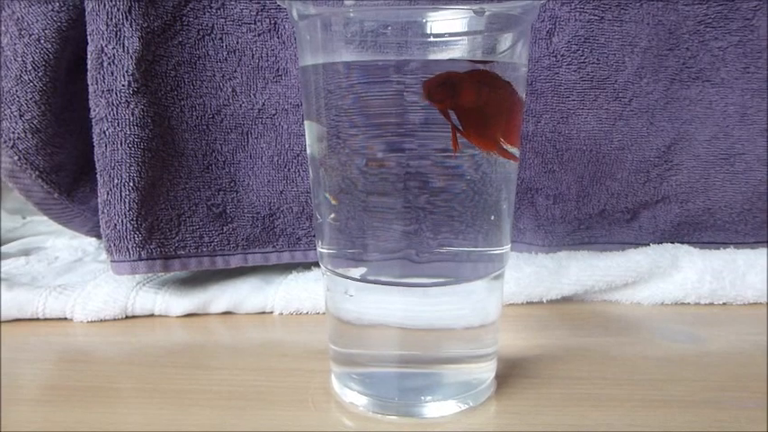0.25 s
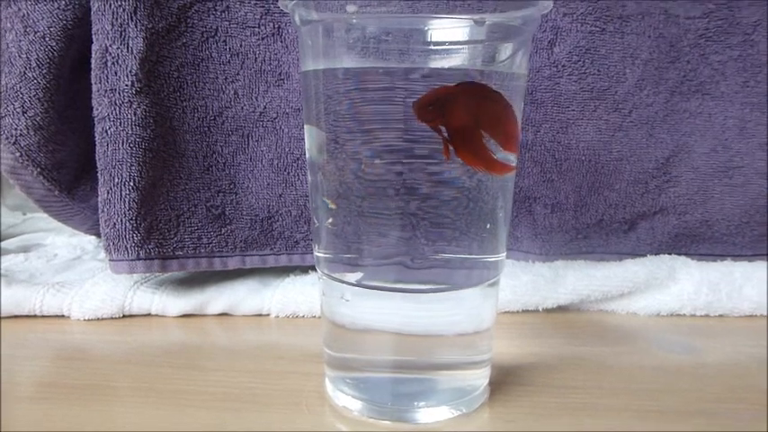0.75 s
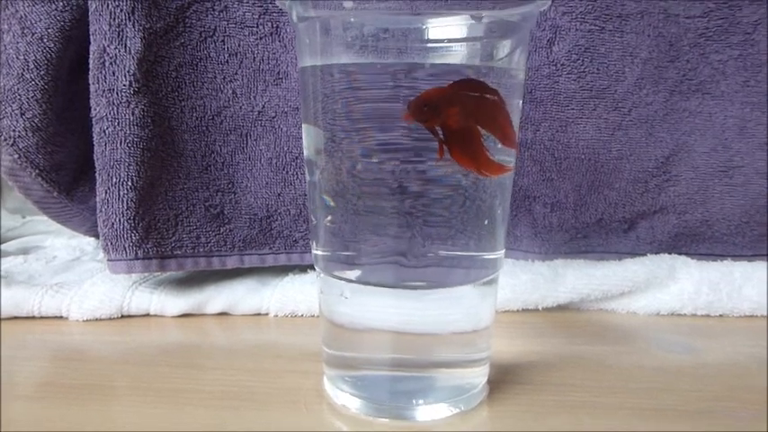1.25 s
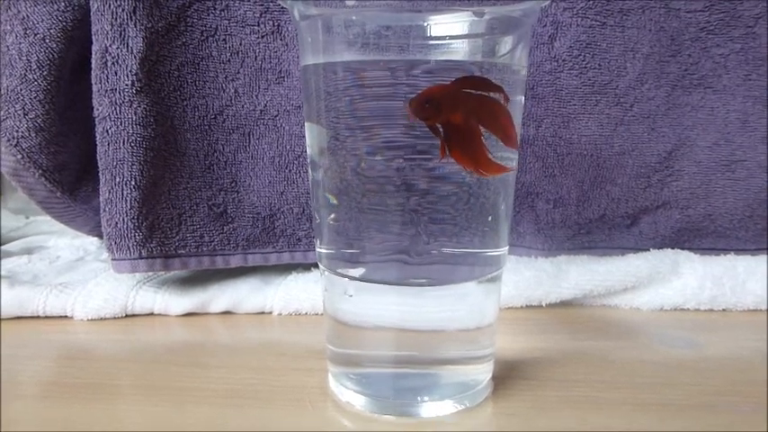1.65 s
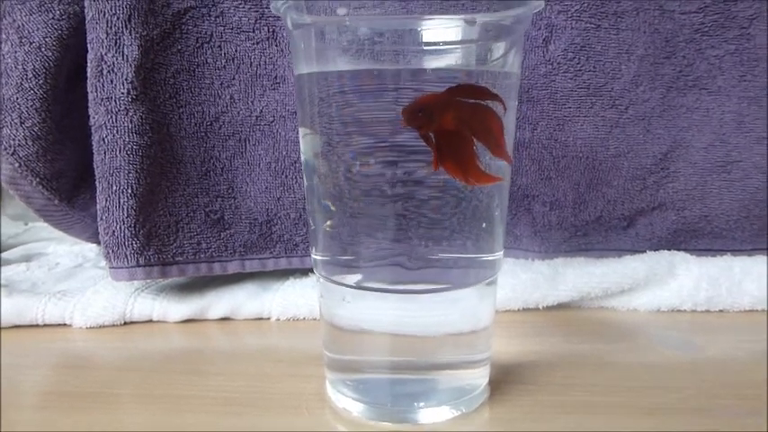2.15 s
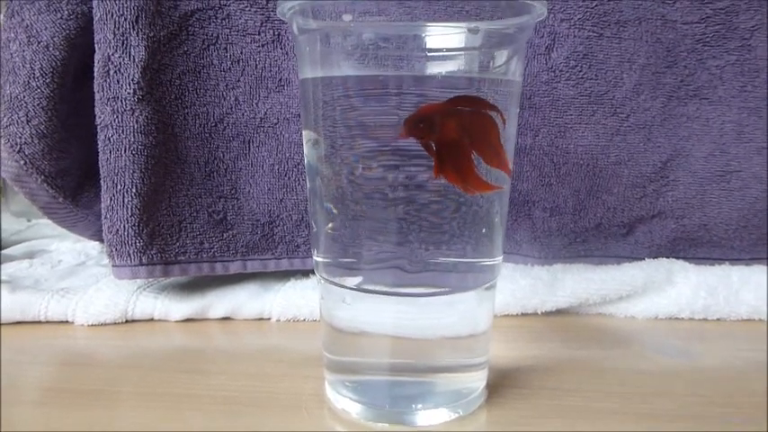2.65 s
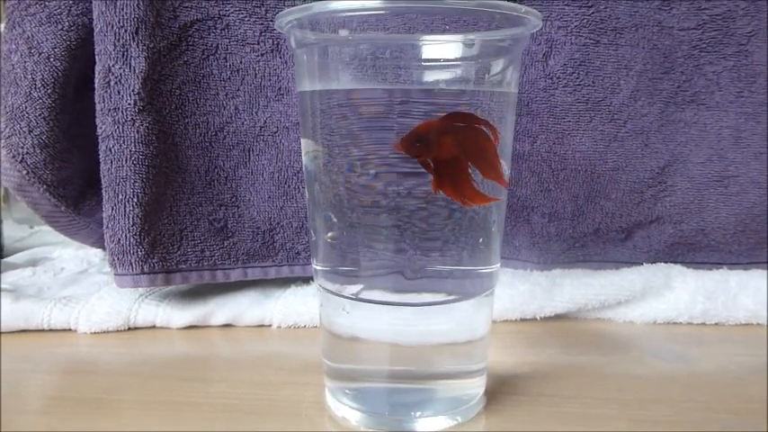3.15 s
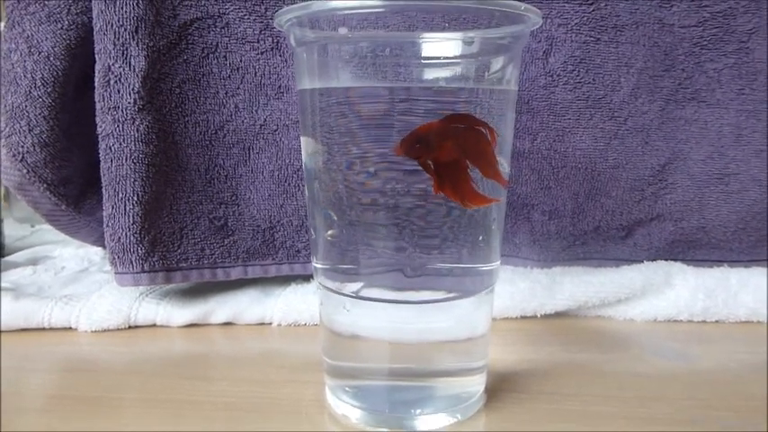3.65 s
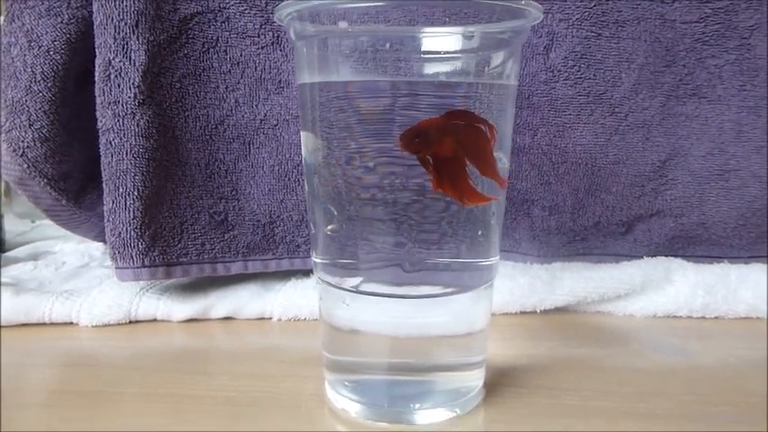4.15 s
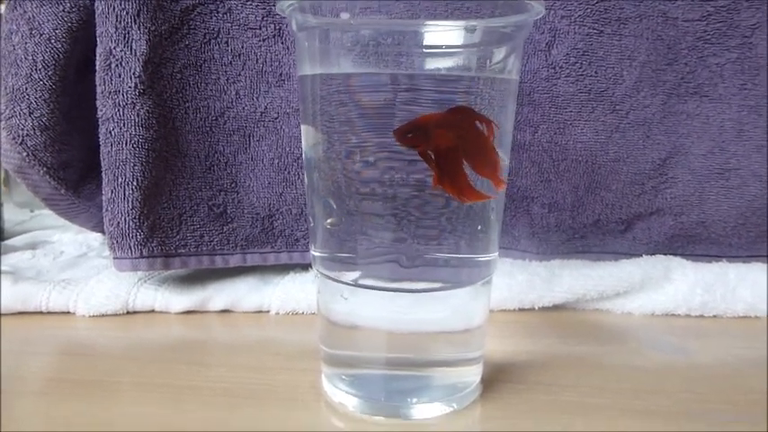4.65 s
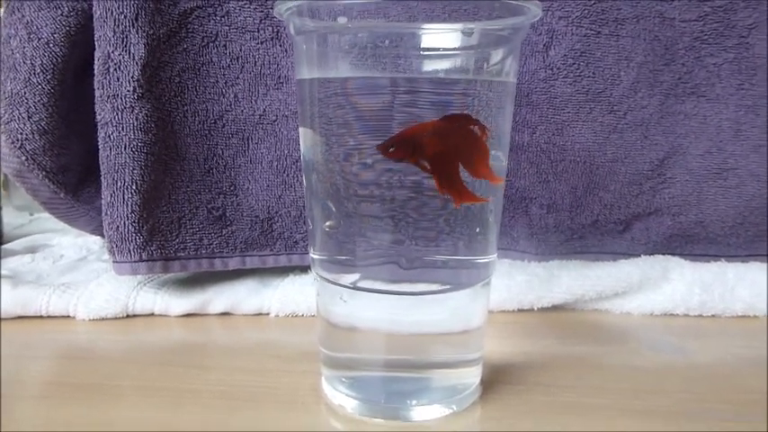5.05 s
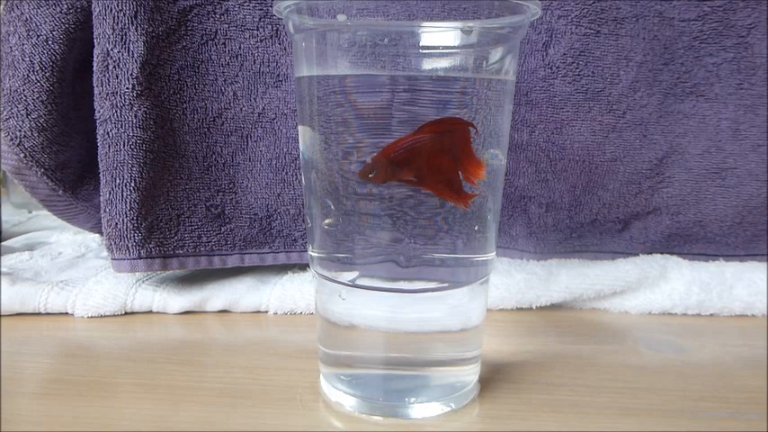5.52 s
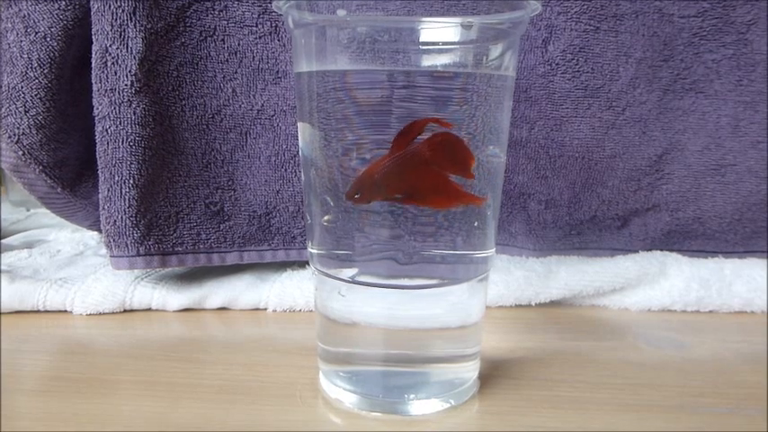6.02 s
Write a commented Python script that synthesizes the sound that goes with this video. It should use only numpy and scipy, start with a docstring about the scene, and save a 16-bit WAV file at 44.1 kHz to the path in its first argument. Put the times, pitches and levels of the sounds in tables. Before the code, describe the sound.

In a still room, fingers touch the device picking up the sound: low muffled thumps, a sharp clack, scratchy sliding, another crisp click near two seconds. The rest is calm, with a small loose part chattering quietly and irregularly over microphone hiss. The fish in its cup of water makes no audible sound. Dry, close, with barely any echo.

```python
"""Fingers bump the case of a hand-held camera in a quiet room, then click, slide along it and click again.
Each blow is a low thud plus the ringing case; snaps, a grainy rasp and a lumpy rumble come from skin and grip.
Something loose in the camera, probably its lens, flutters as the hand trembles: noise shakes its resonances.
Steady room air and microphone hiss lie beneath. Sound carried by the case reaches the two microphones unequally."""
import sys
import numpy as np
from scipy import signal
from scipy.fft import rfft, irfft
from scipy.io import wavfile

SR = 44100
rng = np.random.default_rng(int(sys.argv[2]) if len(sys.argv) > 2 else 0)


def put_to_file(sound):
    """Save the sound as 16-bit audio at rate SR, in the file named by the first command-line argument."""
    columns = np.atleast_2d(sound).T  # one column per channel
    safe = np.clip(columns, -1, 1)
    whole_steps = np.round(safe * 32767)
    wavfile.write(sys.argv[1], SR, whole_steps.astype(np.int16))


N = 276992  # length [samples]


def gain_of(db):
    """Turns decibels into a plain multiplier."""
    return 10 ** (np.asarray(db) / 20)


def evened(x):
    """Scales a signal or spectrum to an average (rms) strength of 1."""
    return x / np.sqrt(np.mean(abs(x) ** 2) + 1e-20)


def read(points, hz):
    """Reads every column of a spectrum table at the given frequencies, evenly in pitch."""
    table_hz, *columns = np.transpose(points)
    return [np.interp(np.log(hz + 1), np.log(table_hz + 1), column) for column in columns]


def follow(curve):
    """Reads every column of a time table at each sample."""
    times, *columns = np.transpose(curve)
    return [np.interp(np.arange(N) / SR, times, column) for column in columns]


def sides(balance_db):
    """Left and right gains that differ by the balance and keep a mean power of 1."""
    half_db = np.atleast_1d(balance_db) / 2
    pair = np.array([gain_of(half_db), gain_of(-half_db)])
    return pair / np.sqrt(np.mean(pair ** 2, axis=0))


def add(mix, start_s, sound):
    """Mixes a sound in at its start time, cut off at the end of the mix."""
    part = mix[:, max(round(start_s * SR), 0):][:, :sound.shape[1]]
    part += sound[:, :part.shape[1]]


def band(x, order, hz, kind):
    """Keeps the low or the high frequencies with a Butterworth filter."""
    cut_hz = np.clip(hz, 10, SR / 2.1)
    return signal.sosfilt(signal.butter(order, cut_hz, kind, fs=SR, output="sos"), x)


def wander(rate_hz):
    """Smooth random drift of rms 1 that changes up to about rate_hz times a second."""
    hz = np.fft.rfftfreq(N, 1 / SR)
    smoothing = np.exp(-(hz / rate_hz) ** 2)
    return evened(irfft(rfft(rng.standard_normal(N)) * smoothing, N))


def swell(peak_s, rise_s, fall_s, depth_db=19):
    """A hand movement gains depth_db over its rise time up to the peak and loses it over its fall time."""
    t = np.arange(N) / SR - peak_s
    return gain_of(-depth_db * np.maximum(-t / rise_s, t / fall_s))


def causal(gain):
    """Impulse response with this spectrum that starts at once and dies away (minimum phase)."""
    cepstrum = irfft(np.log(np.maximum(gain, 1e-5)))
    half = len(cepstrum) // 2
    fold = np.r_[1, np.full(half - 1, 2), 1, np.zeros(half - 1)]
    return irfft(np.exp(rfft(cepstrum * fold)))


def carried(drive, colour):
    """Two unrelated noises reach the microphones with the colour, balance, phase and likeness of a path."""
    level_db, balance_db, lead, same = read(colour, np.fft.rfftfreq(N, 1 / SR))
    a, b = rfft(drive)
    same = np.clip(same, -1, 1)
    left = (same * a + np.sqrt(1 - same ** 2) * b) * np.exp(1j * lead)
    pair = np.array([left, a])
    return irfft(pair * sides(balance_db) * evened(gain_of(level_db)), N)


# Colour of room air and microphone hiss: (frequency [Hz], relative level per Hz [dB],
# left minus right [dB], left phase lead [rad], left-right likeness [0 to 1])
AIR_COLOUR = [(25, 0, 0, 0, .75), (70, -2, 0, 0, .7), (130, -1, -1, 0, .55), (230, 1, -1, 0, .5),
              (700, 1, -2, 0, .4), (1700, -1, 0, 0, .2), (2700, -5, 0, 3, .2), (3600, -8, 0, 3, .15),
              (4900, -4, 0, 0, 0), (7000, -7.5, -1, 0, .25), (10000, -9, -1, 0, .42),
              (13000, -13, -1, 0, .35), (15500, -18.5, -1, 0, .3)]


def air(level_db=-59.0):
    """Room air and microphone hiss are steady noise, shaped by their colour."""
    return gain_of(level_db) * carried(rng.standard_normal((2, N)), AIR_COLOUR)


def room(x, wet_db=-24, t60_s=0.37):
    """The table and walls return a faint short tail: many random echoes that die away."""
    t = np.arange(SR // 3) / SR
    echoes = rng.standard_normal((2, len(t))) * gain_of(-60 * t / t60_s)
    tail = echoes * (t > .003)  # the first echoes need 3 ms
    return gain_of(wet_db) * signal.fftconvolve(x, tail / np.linalg.norm(tail[0]), axes=1)[:, :N]


# Resonances that the loose lens shakes: (frequency [Hz], half-width at -6 dB [Hz], relative level [dB],
# left minus right [dB], left phase lead [rad])
FLUTTER_RESONANCES = [(350.6, 40, -12, -4.5, 0.5), (420, 47.5, -11, -5.5, 1), (548, 31.5, -7, -5, 1.54),
                      (698, 81.5, -0.5, -19, 0), (812, 43, -2, -6.5, 2.36), (1090, 162, -4, 0.5, 4),
                      (1240, 59, -6.5, 0, 3.5), (1440, 50, -22.5, 9, 4.5), (1676, 39, -15, 3, -2),
                      (1840, 71, -14.5, -3, 3.5), (1930, 72, -24, 1.5, 4), (2430, 79, -27, -3, 2)]
# Strength of the hand's tremor, which calms for a moment near the end: (time [s], relative level [dB])
TREMOR_CURVE = [(0.0, -55.0), (0.06, -40.5), (0.17, -47.5), (0.5, -42.0), (1.3, -41.5), (1.5, -40),
                (1.7, -41.5), (1.9, -38), (2.4, -47), (2.6, -41), (2.8, -45), (3.2, -43), (4.0, -47),
                (4.1, -42.5), (5.4, -46.5), (5.5, -54), (6.1, -49), (6.28, -40)]
# Jolts that shake the lens harder: (time [s], relative peak level [dB])
LENS_JOLTS = [(0.454, -39.5), (0.725, -48), (0.823, -32.5), (1.303, -35.5), (1.343, -36), (2.047, -51),
              (2.087, -54), (2.166, -34), (2.298, -34.5), (2.419, -37), (2.823, -34.5), (3.055, -35.5),
              (3.377, -34.5), (3.488, -49), (3.554, -37), (3.78, -37), (3.887, -36), (4.017, -38),
              (4.253, -34), (4.343, -34), (4.792, -37), (4.899, -33.5), (4.962, -36), (5.147, -42.5),
              (5.257, -39), (5.285, -35), (5.539, -38.5), (5.579, -41), (5.776, -41.5), (5.983, -37.5)]


def flutter(level_db=-2.07, uneven_db=4.5, uneven_hz=42, own_share=0.72, sway_db=0.87, sway_hz=10,
            tilt_db_per_octave=0.3, dulling_per_octave=0.44, usual_db=-45,
            jolt_db=-6.0, rise_s=0.0013, fall_s=0.0088, tap_db=19, tap_tilt_db_per_octave=-2.0):
    """The lens chatters in short uneven bursts that fall unequally on its resonances.
    The tremor sways at random, and the harder it is, the more it favours the low resonances.
    A jolt taps the lens against its seat and starts a stronger burst."""
    t = np.arange(SR // 8) / SR
    burst = (1 - np.exp(-t / rise_s)) * np.exp(-t / fall_s)
    bursts, taps = np.zeros((1, N)), np.zeros(N)
    jolt_s, jolt_peak_db = np.transpose(LENS_JOLTS)
    jolt_samples = np.round(jolt_s * SR).astype(int)
    for start_s, peak_db in LENS_JOLTS:
        add(bursts, start_s, gain_of(peak_db + jolt_db) * burst[None] / burst.max())

    tremor_db = follow(TREMOR_CURVE)[0] + sway_db * wander(sway_hz)
    bright_db = tilt_db_per_octave - dulling_per_octave * (tremor_db - usual_db)
    f = np.fft.rfftfreq(N, 1 / SR)
    shared = wander(uneven_hz)
    out = 0
    # a tap pushes each resonance one way or the other
    directions = rng.choice([-1, 1], (len(LENS_JOLTS), len(FLUTTER_RESONANCES)))
    for (hz, width, db, balance_db, lead), direction in zip(FLUTTER_RESONANCES, directions.T):
        octaves = np.log2(hz / 700)
        lumps = evened(gain_of(uneven_db * evened(shared + own_share * wander(uneven_hz))))
        shake = gain_of(level_db + tremor_db + bright_db * octaves) * lumps
        peak_db = jolt_peak_db + tap_db + tap_tilt_db_per_octave * octaves
        taps[jolt_samples] = direction * gain_of(peak_db)
        force = rfft(np.hypot(shake, bursts[0]) * rng.standard_normal(N) + taps)
        # two coupled poles: a rounded peak with steep skirts
        resonance = evened((1 + 1j * (f - hz) / width) ** -2)
        path = gain_of(db) * sides(balance_db) * np.exp([[1j * lead], [0]])
        out = out + path * resonance * force
    return irfft(out, N) / np.linalg.norm(gain_of(np.array(FLUTTER_RESONANCES)[:, 2]))


# Colour of the grip's rumble: (frequency [Hz], relative level per Hz [dB],
# left minus right [dB], left phase lead [rad], left-right likeness [0 to 1])
RUMBLE_COLOUR = [(30, -37, -6, 0, .8), (70, -8, -20, 0, 1), (126, 7, -4, 0.0041, 1), (220, 8, 3, 0, 0.5),
                 (400, -3, -5, 0, 0.94), (1000, -33, -3, 0, .8)]
# Shifts of the grip: (time of the firmest moment [s], rise and fall time [s], rumble level [dB])
GRIP_SHIFTS = [(.33, 0.34, -56), (.57, 0.24, -51), (.81, 0.087, -41.5), (1.04, .06, -55.5),
               (1.411, 0.21, -49), (1.64, 0.17, -51.5), (1.83, .05, -54), (2.2, 0.38, -63.5),
               (6.18, 0.064, -59)]


def grip(uneven_db=2.5, uneven_hz=35):
    """Each shift of the hand on the case gives a lumpy rumble: noise that swells and fades."""
    pushes = [gain_of(db) * swell(peak_s, length_s, length_s) for peak_s, length_s, db in GRIP_SHIFTS]
    push = np.linalg.norm(pushes, axis=0)
    lumps = evened(gain_of(uneven_db * wander(uneven_hz)))
    return carried(push * lumps * rng.standard_normal((2, N)), RUMBLE_COLOUR)


# Colours of the sliding skin, first the grainy rasp, then the finer hiss: (frequency [Hz],
# relative level per Hz [dB], left minus right [dB], left phase lead [rad], left-right likeness [0 to 1])
RASP_COLOUR = [(64, -19, 14, 18.5, 0.57), (362, 15, -19, -9.5, 0.91), (714, -22, -10, -1, 0.72),
               (1140, 11, 5.5, 3, 1), (1850, 3.5, -4.5, 3, 0.69), (2980, 2, -7, 3, 0.48),
               (5500, -3.5, 12.5, 0.5, 0.62), (8000, -9, 2, 2, 0.87), (12000, -23, 2, 3, 0.78),
               (15500, -32, 0, 0, .6)]
HISS_COLOUR = [(1500, -2.5, -9, 0, 1), (4000, 1, 7, 0, 0.88), (7000, 0, 8, 0, 0.37), (10000, 6, 2, 0, 0.58),
               (12500, -2.5, 4, 0, 0.6), (15500, -18, 1, 0, .7)]
# Strokes of a finger along the case: (time of the fastest moment [s], rise time [s], fall time [s],
# rasp level [dB], fine hiss level [dB])
FINGER_STROKES = [(.56, 0.22, 0.17, -53, -77), (.86, 0.39, 0.34, -56.5, -73),
                  (1.439, 0.077, 0.13, -35, -47), (1.62, .09, 0.073, -43.5, -59),
                  (1.775, 0.059, 0.0093, -52, -48), (1.915, 0.11, 0.046, -45, -37.5)]


def slide(rasp_grain_db=5.2, hiss_grain_db=4.0, slips_hz=450):
    """Skin sticks and slips on the case during each stroke: a grainy rasp and a finer hiss."""
    rasp, hiss = 0, 0
    for peak_s, rise_s, fall_s, rasp_db, hiss_db in FINGER_STROKES:
        speed = swell(peak_s, rise_s, fall_s)
        rasp = np.hypot(rasp, gain_of(rasp_db) * speed)
        hiss = np.hypot(hiss, gain_of(hiss_db) * speed)
    slips = np.minimum(wander(slips_hz), 2)  # a slip can only be so large
    rasp = rasp * evened(gain_of(rasp_grain_db * slips)) * rng.standard_normal((2, N))
    hiss = hiss * evened(gain_of(hiss_grain_db * slips)) * rng.standard_normal((2, N))
    return carried(rasp, RASP_COLOUR) + carried(hiss, HISS_COLOUR)


# Colour of a snap: (frequency [Hz], relative level [dB])
SNAP_COLOUR = [(100, -25), (1000, 0.5), (2200, 3.5), (4000, 3.5), (6500, 6), (10000, 0), (13000, 0),
               (15500, -18)]
# Sharp snaps of skin letting go of the case: (time [s], level before the cut-off [dB],
# left minus right [dB], treble cut-off [Hz])
SKIN_SNAPS = [(0.959, -26.5, -9, 7000), (1.0937, -37.5, 4, 9000), (1.152, -35.5, 6, 9000),
              (1.3662, -31, 9, 9000), (1.3784, -37, 2, 9000), (1.4233, -15.5, 8, 7000),
              (1.4252, -4.5, 15, 4600), (1.555, -27, 7, 11000), (1.5757, -29.5, 10, 9000),
              (1.5881, -31.5, -5, 10000), (1.617, -33, -10, 7000), (1.7054, -29.5, 10, 10000),
              (1.76, -32, 12, 10000), (1.774, -28, 7, 10000), (1.791, -33, 11, 10000),
              (1.821, -30.5, 7, 10000), (1.843, -26, 7, 12000), (1.9214, -11, 1, 11000),
              (1.973, -26.5, 1, 4000)]


def ticks(tail_db=-20, tail_t60_s=0.02):
    """Skin letting go gives one sharp impulse, trailed by a brief fading scatter of noise."""
    t, out = np.arange(1024) / SR, np.zeros((2, N))
    snap = causal(gain_of(read(SNAP_COLOUR, np.fft.rfftfreq(len(t), 1 / SR))[0]))
    snap = snap[None] / abs(snap).max()
    for start_s, peak_db, balance_db, cut_hz in SKIN_SNAPS:
        scatter = gain_of(tail_db - 60 * t / tail_t60_s) * rng.standard_normal((2, len(t)))
        force = band((t == 0) + scatter, order=2, hz=cut_hz, kind="low")
        tick = signal.fftconvolve(force, snap, axes=1)
        add(out, start_s, gain_of(peak_db) * sides(balance_db) * tick)
    return out


# Modes (ringing tones) of the case: (frequency [Hz], relative level [dB], time to fade by 60 dB [s],
# left minus right [dB], left phase lead [rad])
CASE_MODES = [(134, -36, 0.12, -20, 4.5), (460, -34, 0.03, -24, 17), (698, 1.5, 0.0038, 6.5, 3),
              (1237, -1.5, 0.013, 1, 3.5), (1638, -9.5, 0.022, -4.5, 3.5), (2130, -18.5, 0.016, 17, 1),
              (2600, -14, 0.0046, -18, 1), (2965, -12, 0.0053, -15, 0.5), (3880, -8, 0.0075, 5.5, 4),
              (5400, -37, 0.0026, 5, -24)]
# Finger blows on the case: (time [s], relative thud level [dB], thud frequency [Hz],
# thud time to fade by 60 dB [s], relative case ring level [dB], ring treble cut-off [Hz])
FINGER_BLOWS = [(0.24, -30, 353, 0.047, -23, 1100), (0.314, -27, 220, 0.016, -26, 800),
                (0.363, -23.5, 217, 0.012, -35, 800), (0.39, -29.5, 220, 0.026, -17, 785),
                (0.576, -24, 216, 0.051, -20, 600), (0.6142, -17.5, 340, 0.011, -25, 795),
                (0.682, -24, 182, 0.038, -19, 600), (0.751, -23.5, 327, 0.012, -34, 700),
                (0.804, -18.5, 330, 0.023, -25, 1000), (1.422, -26.5, 202, 0.013, -16, 3500),
                (1.4244, -10, 428, 0.016, 0, 2800), (1.616, -24, 343, 0.012, -23, 2480),
                (1.6439, -19, 322, 0.033, -8.5, 1100), (1.9213, -11.5, 320, 0.026, -5.5, 2570)]


def knocks(thud_balance_db=-2, thud_rise_s=.001, lag_at_1khz_s=0.00058, contact_s=.00008, skirt_share=0.41):
    """Each blow gives a low damped thud and rings the case; a soft finger pad spares the high modes."""
    t, out, ring = np.arange(SR // 8) / SR, np.zeros((2, N)), 0
    for hz, db, t60_s, balance_db, lead in CASE_MODES:
        # bending waves are slower the lower they are, so the low modes arrive last
        age = np.maximum(t - lag_at_1khz_s * np.sqrt(1000 / hz), 0)
        envelope = (1 - np.exp(-age / contact_s)) * gain_of(db - 60 * age / t60_s)
        tone = np.sin(2 * np.pi * hz * age + np.array([[lead], [0]]))
        mode = sides(balance_db) * envelope * tone
        # a mode gives off little far below its pitch
        ring = ring + band(mode, order=2, hz=skirt_share * hz, kind="high")
    for start_s, thud_db, thud_hz, t60_s, ring_db, cut_hz in FINGER_BLOWS:
        envelope = gain_of(thud_db - 60 * t / t60_s) * (1 - np.exp(-t / thud_rise_s))
        thud = sides(thud_balance_db) * envelope * np.sin(2 * np.pi * thud_hz * t)
        softened_ring = gain_of(ring_db) * band(ring, order=2, hz=cut_hz, kind="low")
        add(out, start_s, thud + softened_ring)
    return out


def scene(bass_cut_hz=95):
    """Handling noises over the flutter and the still room; the small case passes little deep bass."""
    blows = band(knocks(), order=3, hz=bass_cut_hz, kind="high") + ticks()
    return blows + room(blows) + slide() + grip() + flutter() + air()


def record(dry, offset=-.003, ceiling=.85, edge_hz=15600):
    """Soft overload rounds the loudest peaks; the converter limits the band and adds a small constant offset."""
    limited = ceiling * np.tanh(dry / ceiling)
    low_pass = signal.firwin(511, edge_hz, window=("kaiser", 9), fs=SR)
    return offset + signal.oaconvolve(limited, low_pass[None], "same")


dry = scene()
out = record(dry)
put_to_file(out)
```